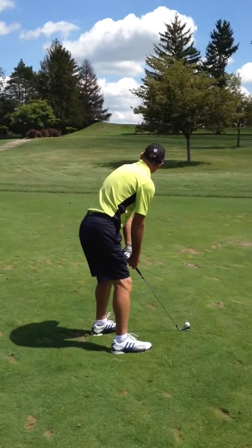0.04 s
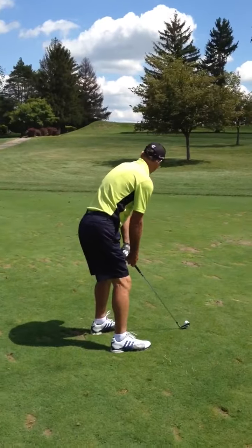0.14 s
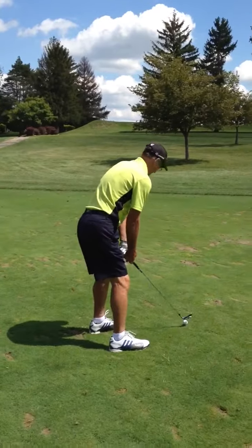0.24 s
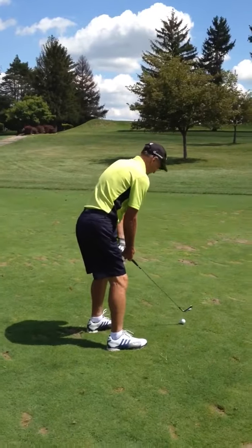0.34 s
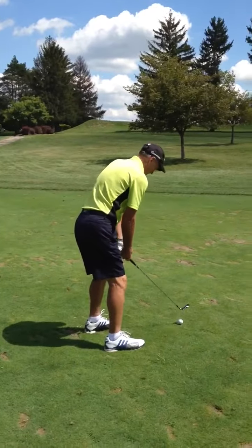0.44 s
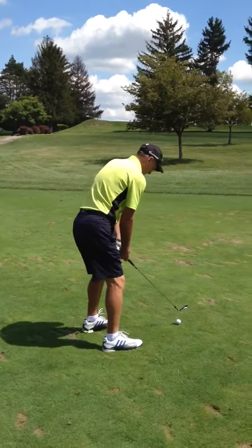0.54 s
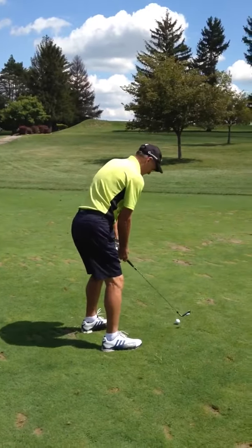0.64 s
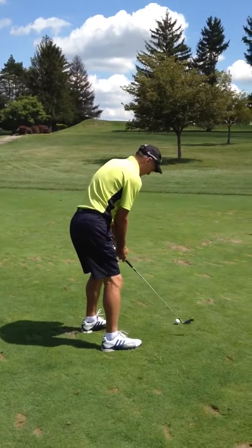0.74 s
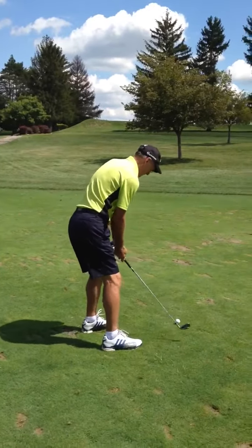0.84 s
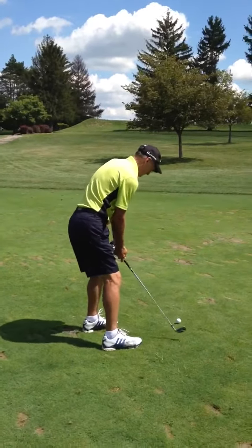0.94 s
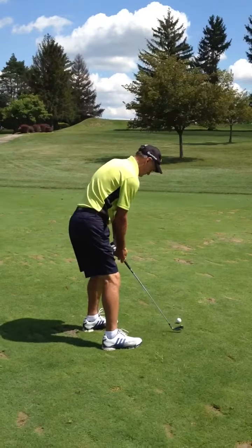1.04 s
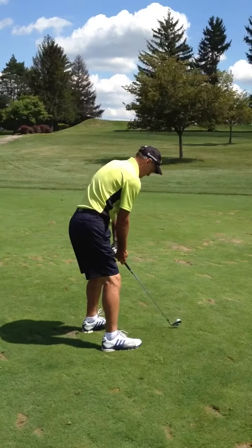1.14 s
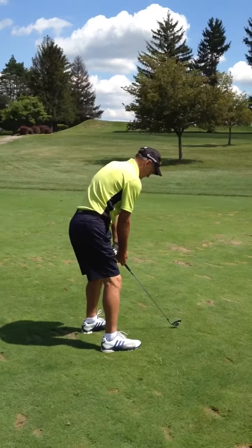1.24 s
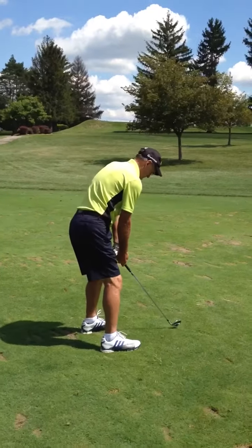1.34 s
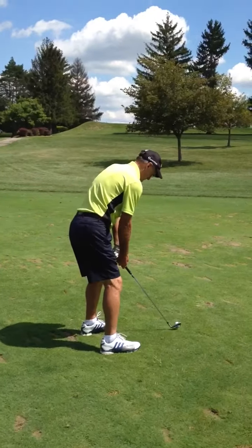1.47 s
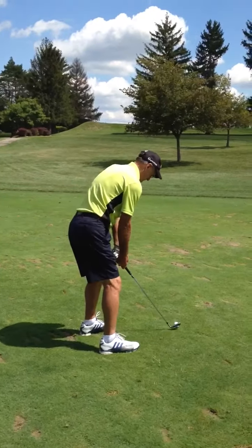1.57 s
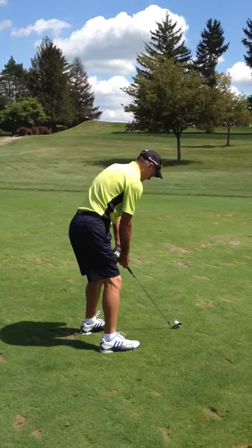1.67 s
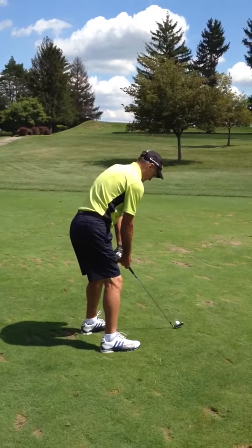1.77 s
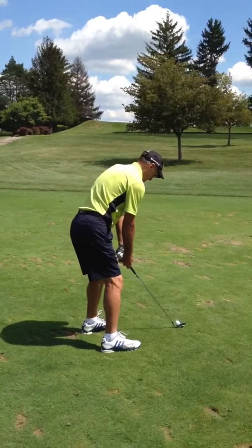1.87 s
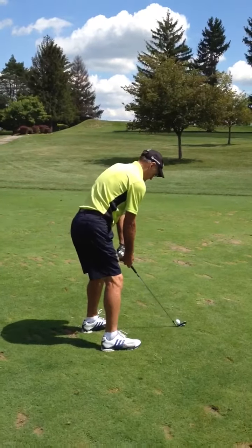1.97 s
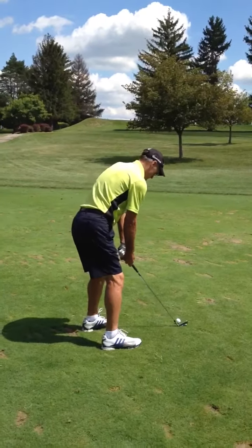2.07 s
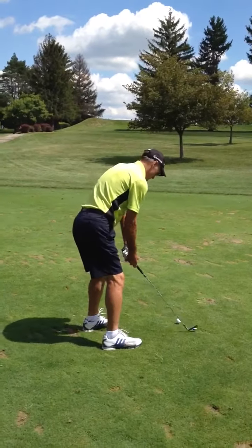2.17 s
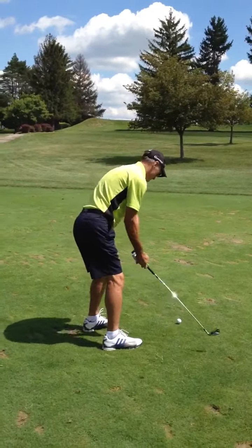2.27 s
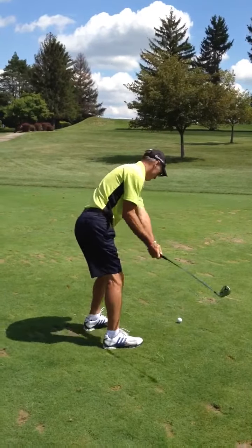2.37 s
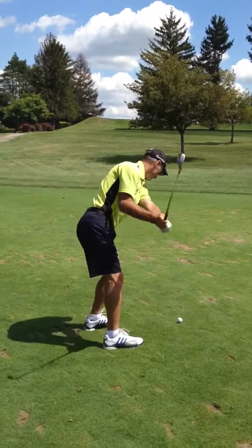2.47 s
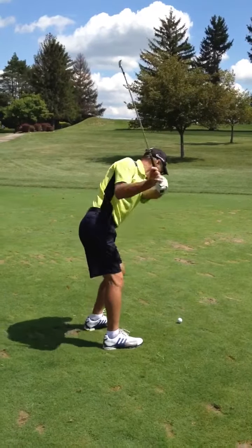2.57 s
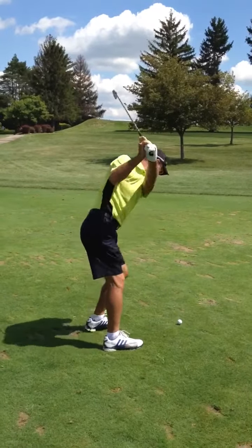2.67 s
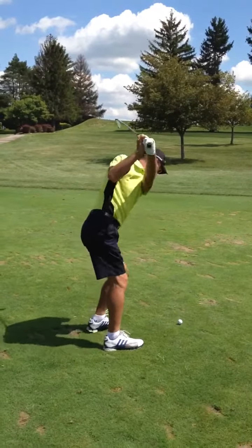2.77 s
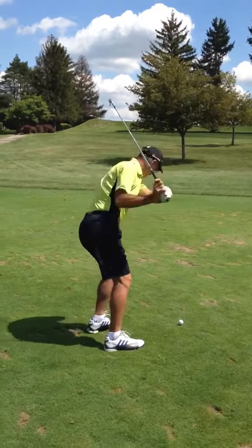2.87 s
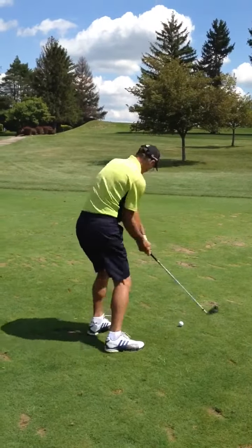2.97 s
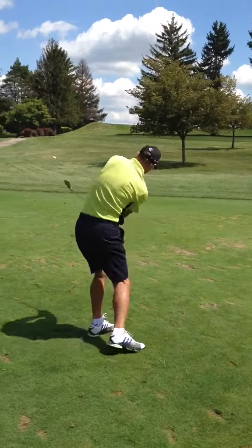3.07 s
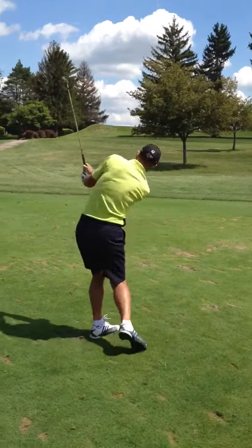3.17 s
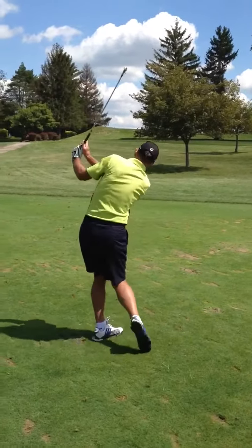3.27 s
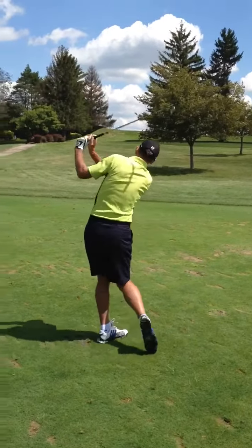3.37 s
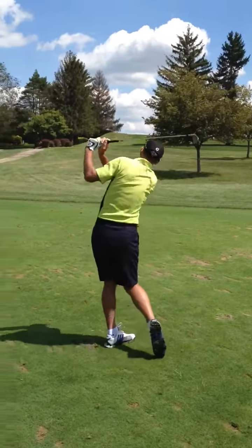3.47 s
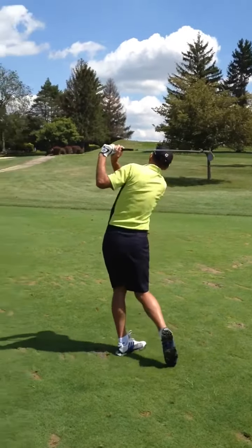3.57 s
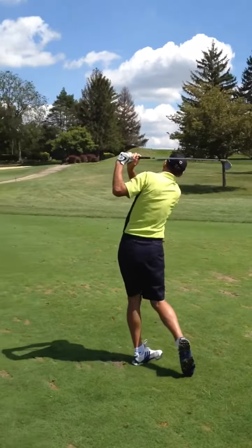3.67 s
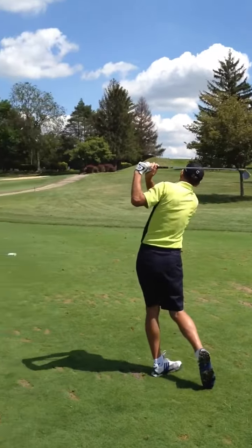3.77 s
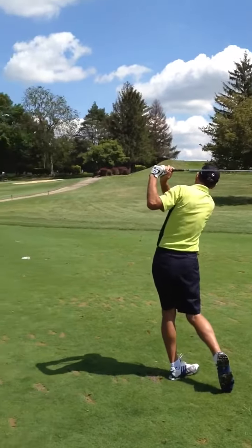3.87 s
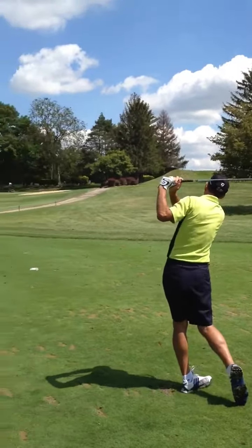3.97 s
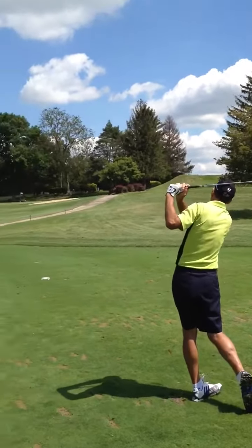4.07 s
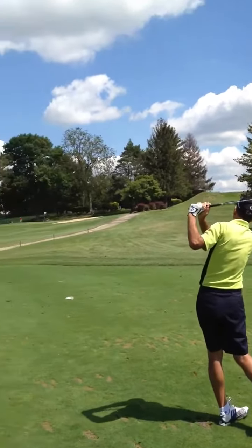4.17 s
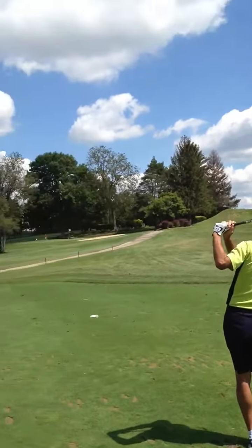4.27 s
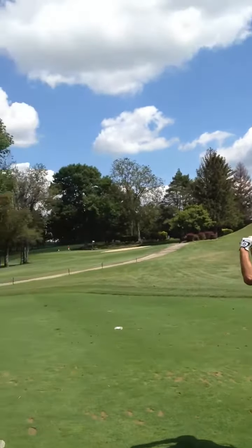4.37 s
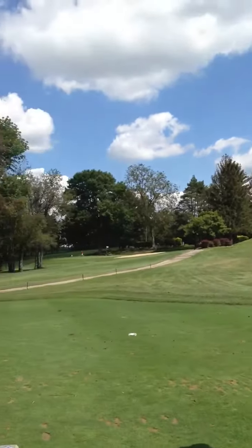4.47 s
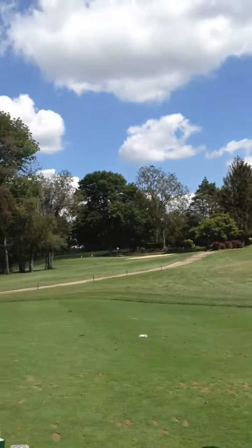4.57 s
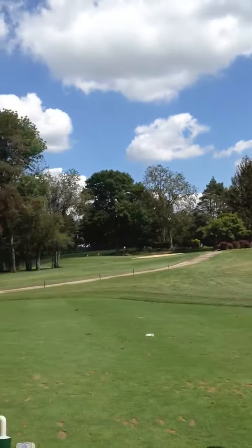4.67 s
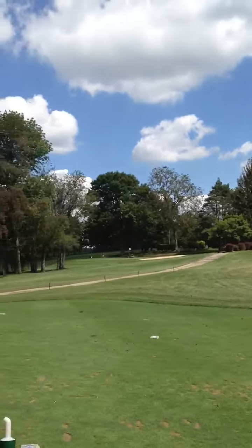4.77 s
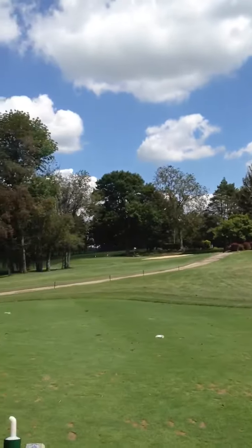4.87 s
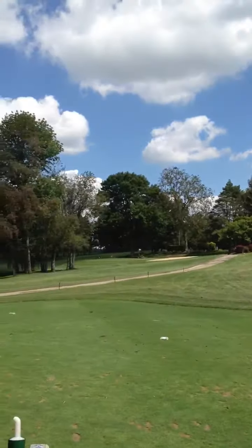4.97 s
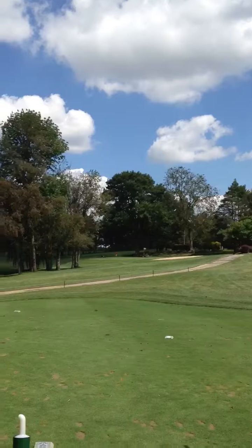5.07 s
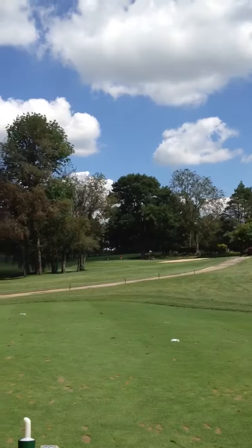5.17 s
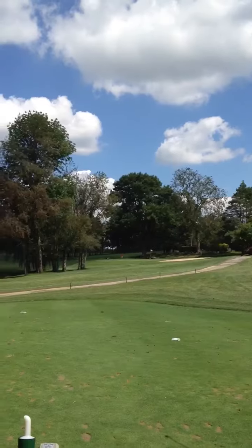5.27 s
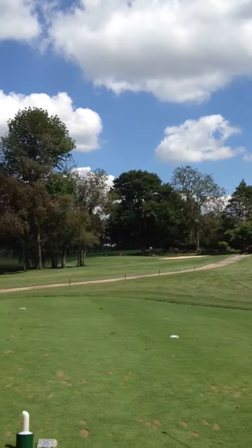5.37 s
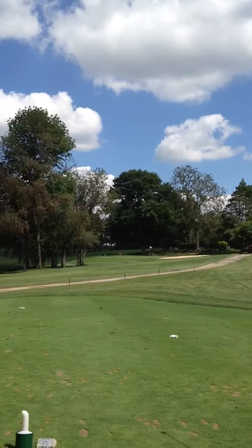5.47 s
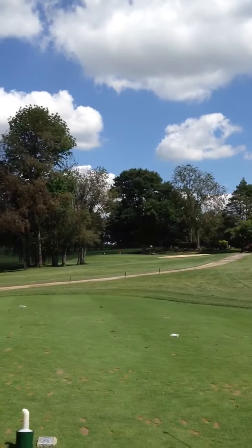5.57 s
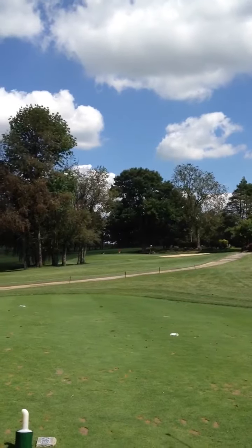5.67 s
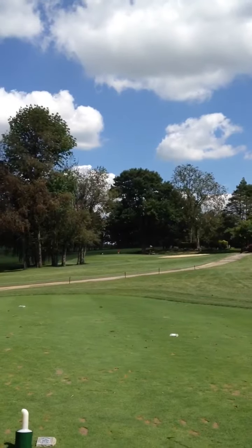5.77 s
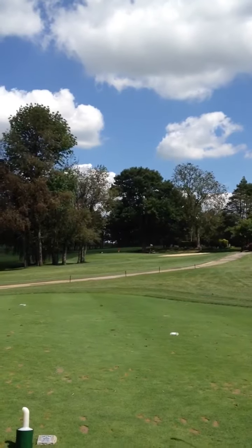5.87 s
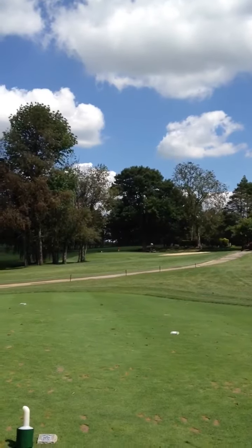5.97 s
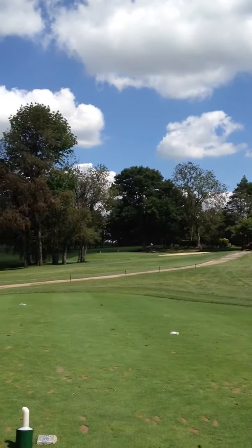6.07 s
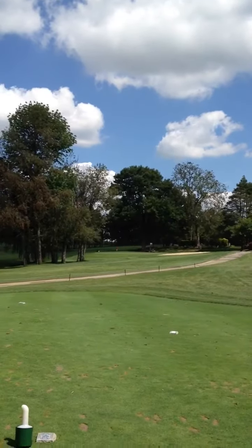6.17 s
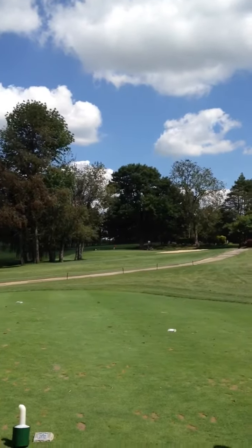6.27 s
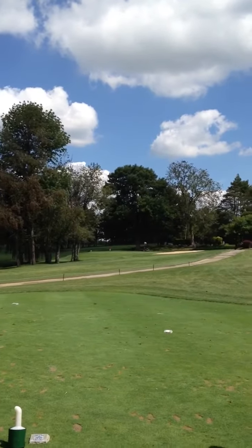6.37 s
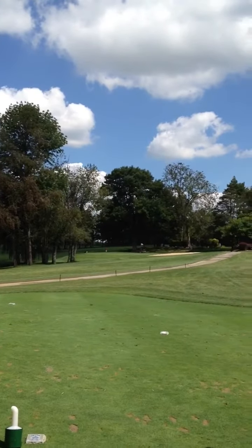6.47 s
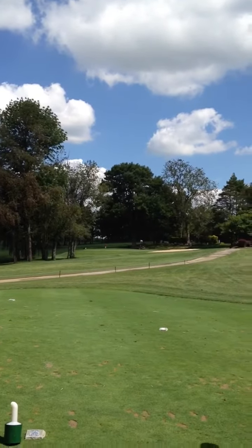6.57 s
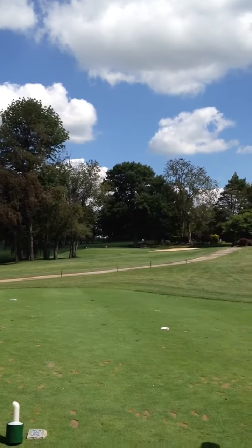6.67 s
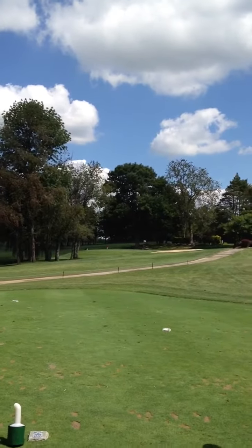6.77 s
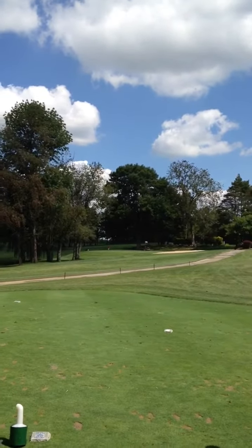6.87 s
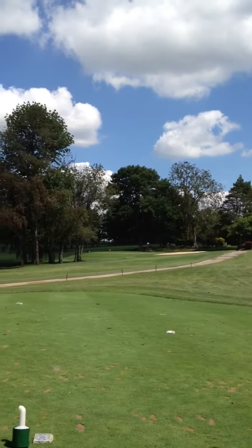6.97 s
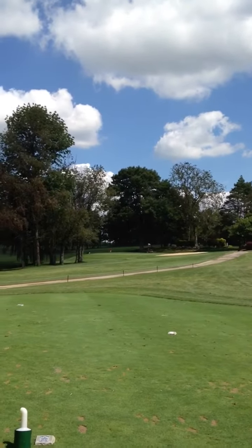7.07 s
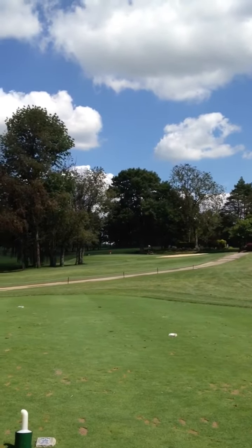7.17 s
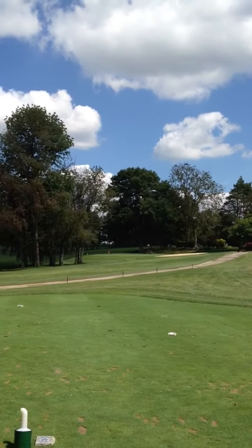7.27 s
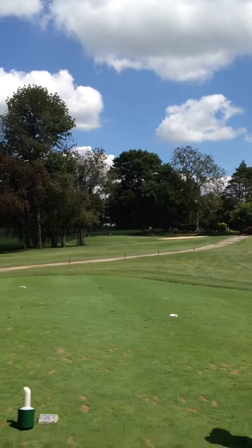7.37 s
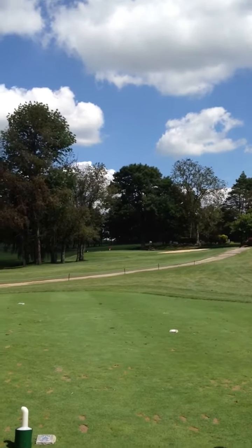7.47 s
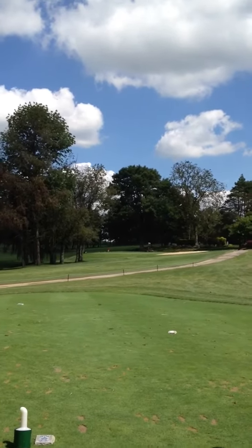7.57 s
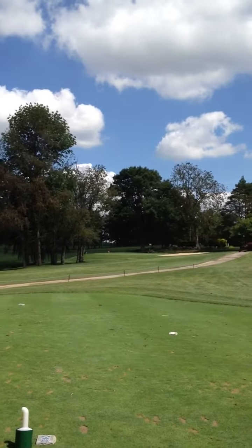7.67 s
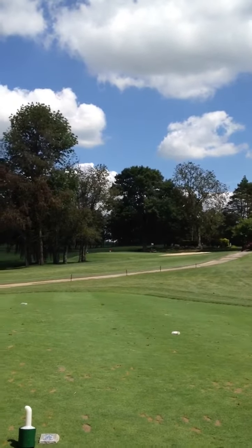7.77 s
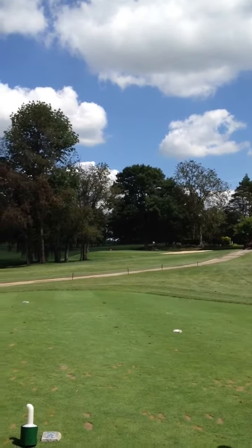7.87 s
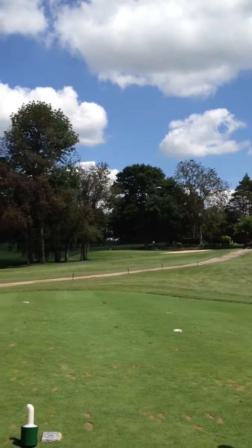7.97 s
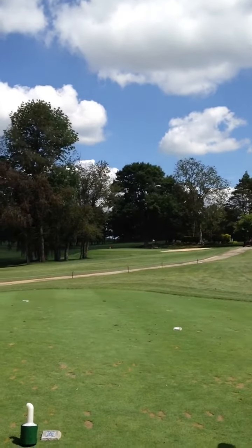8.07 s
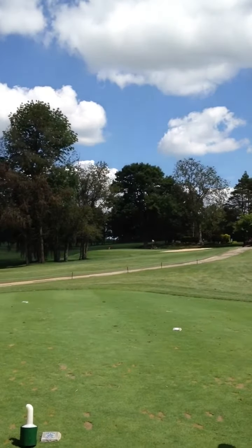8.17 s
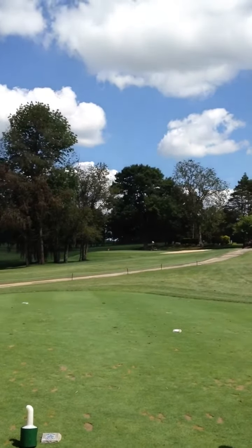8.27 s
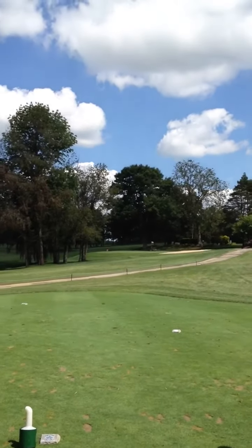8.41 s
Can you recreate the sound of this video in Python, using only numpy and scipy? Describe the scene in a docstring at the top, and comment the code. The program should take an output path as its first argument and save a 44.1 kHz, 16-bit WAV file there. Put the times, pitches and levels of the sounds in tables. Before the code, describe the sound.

Crickets hiss and katydids buzz outdoors while a golfer strikes a ball once, with a quick swish, a crack and a scuff of turf.

```python
"""A golfer swings an iron: vortex shedding makes a swish, impact excites the modes of club and ball in
one sharp crack, and the sole scuffs up a spray of turf. In the summer grass insects stridulate: katydids
take turns with a few ticks and a buzz that swells and stops short, over a hiss of crickets. A distant
mower drones at harmonics of its firing rate, two faint whines pass, and the air is a steady wash.
The hand-held mono microphone is bumped after the shot."""
import sys
import numpy as np
from scipy import signal
from scipy.fft import rfft, irfft
from scipy.io import wavfile

SR = 44100
rng = np.random.default_rng(int(sys.argv[2]) if len(sys.argv) > 2 else 0)


def persist_wave(psi):
    """Save psi, clipped to +-1, as 16-bit WAV."""
    counts = np.round(np.clip(psi, -1, 1) * 32767).astype(np.int16)
    wavfile.write(sys.argv[1], SR, np.atleast_2d(counts).T)


N = 372204
T = np.arange(N) / SR
STRIKE_S = 3.0336  # the club meets the ball

# Modes of club head and ball (f/Hz, level/dB, T60/s, sign at the point of contact)
CLUB_MODES = [(790, -17, 0.0089, -1), (1900, -11.5, 0.0024, 1), (3000, -16.5, 0.0042, -1),
              (3640, -18, 0.0062, 1), (6280, -14.5, 0.0059, -1), (8030, -17.5, 0.0053, -1),
              (9670, -24.5, 0.0098, -1), (11070, -19.5, 0.01, -1), (12500, -20, .007, 1),
              (14700, -24, .005, -1), (1160, -26, 0.019, -1), (1340, -26, 0.028, -1),
              (1550, -50, 0.023, -1), (2770, -32, 0.024, -1), (4890, -28, .02, -1), (5480, -30, .022, -1)]
def strike(contact_s=.0005):
    """Impact excitation: heavily damped modes crack, lightly damped ones ring."""
    top_hz = np.max(CLUB_MODES)
    # low modes start as the ball is squeezed, high ones as it springs off the face
    return sum(sign * ring(STRIKE_S + contact_s * hz / top_hz, hz, db, t60, rise=0.0003)
               for hz, db, t60, sign in CLUB_MODES)


# Whistles of shaft and head in the downswing (peak t/s, half-width/s, level/dB)
WHISTLES = [(3.001, .009, -40.5), (3.0268, 0.0068, -35)]
# Spectrum of the air rushing round the head (f/Hz, relative level/dB)
RUSH_SPECTRUM = [(100, -25), (300, -5), (700, 0), (1300, -5), (1800, -10.5), (4000, -13.5), (6000, -20),
                 (9000, -38)]
def swish(strike_hz=600, sag_hz_per_s=420, rush_peak_s=2.991, rush_peak_db=-45):
    """Vortex shedding: a wavering tone sinks as the club goes by, inside a broad rush of air."""
    vortex_hz = strike_hz - sag_hz_per_s * (T - STRIKE_S)
    tone = unit(np.sin(phase(vortex_hz * (1 + 0.0482 * drift(rate=110)))))
    whistle = sum(amp(db) * hump(s, half) for s, half, db in WHISTLES)
    since_peak = T - rush_peak_s
    rush_db = rush_peak_db + np.minimum(530 * since_peak, -230 * since_peak)  # rise and fall in dB/s
    return whistle * tone + amp(rush_db) * noise(RUSH_SPECTRUM)


# Bursts of turf and grit (t/s, level/dB, rise/s, T60/s)
TURF_BURSTS = [(3.0344, -21.5, .0008, 0.032), (3.048, -49.5, .004, 0.17), (3.082, -48.5, 0.0043, 0.45)]
# Spectrum of the scuff (f/Hz, relative level/dB)
TURF_SPECTRUM = [(100, -26), (250, -4), (400, -10), (700, -3), (1200, 6), (2500, -1.5), (3900, 0.5),
                 (4450, -2), (5000, -3), (6500, 1), (7300, -8), (9000, -6), (13000, -4), (16000, -21)]
def turf():
    """Friction noise: the sole tears the turf and throws grit in decaying bursts."""
    scuff = sum(amp(db) * burst(s, rise, t60) for s, db, rise, t60 in TURF_BURSTS)
    return scuff * noise(TURF_SPECTRUM)


# Knocks of club on ground and of hand on microphone (t/s, f/Hz, level/dB, T60/s)
KNOCKS = [(3.034, 257, -43, 0.15), (3.041, 166, -36.5, 0.027), (5.3513, 138.8, -32, 0.04),
          (5.363, 200, -44, 0.045), (7.136, 116, -46, .05)]
def thumps():
    """Damped oscillation: each soft blow excites one low mode."""
    return sum(ring(s, hz, db, t60, rise=0.0021) for s, hz, db, t60 in KNOCKS)


# Buzzes of katydids answering each other, near and far (start t/s, end t/s, level/dB)
BUZZES = [(-.12, 0.556, -52.5), (.63, 1.358, -56.5), (1.15, 1.65, -59), (1.558, 2.258, -53),
          (2.46, 3.17, -54.5), (3.02, 3.55, -60), (3.39, 4.14, -51.7), (4.061, 4.65, -53.2),
          (4.56, 5.06, -58.5), (5.05, 5.688, -51), (5.65, 6.34, -53.3), (6.219, 6.82, -60.5),
          (6.793, 7.44, -51), (7.34, 7.99, -52.5)]
# Runs of single wing strokes (first t/s, last t/s, level/dB)
TICK_RUNS = [(.622, .622, -49.5), (1.384, 1.531, -46), (2.321, 2.429, -49.3), (3.211, 3.365, -48),
             (4.815, 4.985, -48), (6.618, 6.773, -44.5), (8.269, 8.429, -46.3)]
# Spectrum of the scraped wing (f/Hz, relative level/dB)
KATYDID_SPECTRUM = [(8500, -56), (9800, -10.5), (11000, -3.5), (12050, 2), (12450, -0.5), (12800, 1.5),
                    (13400, 3.5), (14050, 1), (14600, -2), (15300, -1.5), (17000, -10)]
def katydids(stroke_hz=63.0, stroke_db=3.0, far_chorus_db=-68):
    """Stridulation: a wing scrapes a file; fast even strokes buzz, single strokes tick."""
    # incoherent sources add in power
    power = amp(far_chorus_db) ** 2 + sum((amp(db) * phrase(start, end)) ** 2 for start, end, db in BUZZES)
    stroke_phase = phase(stroke_hz * (1 + 0.0065 * drift(rate=2.1)))
    buzz = np.sqrt(power) * unit(amp(stroke_db * np.cos(stroke_phase)))
    ticks = sum(amp(db) * tick_run(first, last) for first, last, db in TICK_RUNS)
    teeth = unit(amp(0.91 * drift(rate=1000)))
    rasp = shimmer(noise(KATYDID_SPECTRUM), depth_db=2.0, width_hz=98, hold_s=0.23)
    return np.hypot(buzz, ticks) * teeth * rasp


def phrase(start, end, swell_s=0.12, stop_t60=0.21):
    """Exponential growth and decay: the envelope of a buzz gathers, holds and stops short."""
    gather = 1 - np.exp(-np.maximum(T - start, 0) / swell_s)
    return gather * np.exp(-np.log(1000) * np.maximum(T - end, 0) / stop_t60)


def tick_run(first, last, gap_s=.053):
    """Pulse train: the envelope of evenly spaced wing strokes, about gap_s apart."""
    times = np.linspace(first, last, round((last - first) / gap_s) + 1)
    return sum(burst(s, rise=.003, t60=0.045) for s in times)


# Spectrum of the cricket chorus (f/Hz, relative level/dB)
CRICKET_SPECTRUM = [(6000, -40), (6750, -19), (7250, -4.5), (7550, -5.5), (7750, -2.5), (7920, -2),
                    (8030, -1.5), (8170, -2.5), (8550, -8.5), (8750, -9), (8870, -5), (9000, -20.5),
                    (9300, -51)]
def crickets(count=6, trill_hz=50, depth=0.25, start_db=-53.5, growth_db_per_s=0.2357):
    """Incoherent summation: trills, each at its own pace, merge into a slowly growing narrow hiss."""
    paces = trill_hz * np.exp(.2 * rng.standard_normal(count))
    phases = [phase(pace * (1 + 0.048 * drift(rate=4.1))) for pace in paces]
    power = sum((1 + depth * np.cos(angle)) ** 2 for angle in phases)
    hiss = tint(np.sqrt(power) * rng.standard_normal(N), CRICKET_SPECTRUM)
    return amp(start_db + growth_db_per_s * T) * hiss


# Spectrum of a far tree cricket (f/Hz, relative level/dB)
TREE_CRICKET_SPECTRUM = [(4000, -20), (4300, -1.5), (4420, -5), (4560, -3), (4900, -4), (5300, -20)]
def tree_crickets(trill_hz=45, note_hz=4330, note_db=-78.5, band_db=-71):
    """Amplitude modulation: one trill pulses a faint noise band and the nearest insect's thin note."""
    trill = 1 + 0.29 * np.sin(phase(trill_hz * (1 + .03 * drift(rate=2.7))))
    note_gain = amp(note_db + 1.8 * drift(rate=1.8))
    note = unit(np.sin(phase(note_hz * (1 + 0.00408 * drift(rate=40.4)))))
    band = amp(band_db + 0.43 * drift(rate=2)) * noise(TREE_CRICKET_SPECTRUM)
    return trill * (band + note_gain * note)


# Running of the engine (t/s, firing f/Hz, boost of the fourth harmonic/dB)
FIRING = [(0, 80, -11), (1.2, 80.2, -3), (2.3, 81, -8), (3.7, 79.34, 6.5), (4.5, 78.5, -7.5),
          (7.4, 76.4, -16)]
# Harmonics of the exhaust drone (multiple of the firing rate, relative level/dB)
HARMONICS = [(1, -8.5), (3, 0.5), (4, 1)]
# Wind-borne contours of hum, drone and blade roar, before deepening and trim (t/s, level/dB)
HUM_CONTOUR = [(.3, -63), (.8, -69), (1.6, -67), (2.6, -59), (3.4, -61), (3.8, -63.5), (4.6, -56),
               (5.1, -65.5), (6.2, -64.5), (7, -60), (7.37, -51.5), (7.75, -61)]
DRONE_CONTOUR = [(0, -66), (.45, -59.5), (.7, -53.5), (.92, -57.5), (1.4, -57.5), (1.65, -61.5),
                 (1.85, -54), (2.06, -53), (2.28, -60), (2.48, -50.5), (2.72, -57), (3.6, -60.5),
                 (3.9, -56), (5.3, -61), (7.3, -59.5), (7.7, -65.5), (8.05, -59)]
ROAR_CONTOUR = [(0, -60.5), (.8, -59.5), (1.15, -55), (1.6, -57), (2.25, -54), (2.8, -57), (4.4, -60),
                (8.44, -64)]
# Spectra of exhaust rumble and blade roar (f/Hz, relative level/dB)
RUMBLE_SPECTRUM = [(130, -25), (190, -2), (230, -0.5), (300, 2), (360, -5.5), (430, -13), (800, -29.5)]
ROAR_SPECTRUM = [(250, -9.5), (480, -5.5), (620, 2), (850, -4.5), (1300, -12), (2200, -24), (5000, -24)]
def mower():
    """Atmospheric fading: engine harmonics come and go over exhaust rumble and blade roar."""
    hum_db, drone_db, roar_db = curves(HUM_CONTOUR) + curves(DRONE_CONTOUR) + curves(ROAR_CONTOUR)
    firing_hz, fourth_db = curves(FIRING)
    firing = phase(firing_hz * (1 + 0.0048 * drift(rate=2.9) + 0.0076 * drift(rate=30.7)))
    second_order = amp(1.6 * drift(rate=22)) * np.sin(2 * firing)
    half_order = amp(-1.0) * drift(rate=18) * np.sin(2.5 * firing)  # from uneven firing
    hum = unit(second_order + half_order)
    orders, order_db = np.transpose(HARMONICS)
    gains = np.array([amp(db + 3.8 * drift(rate=13)) for db in order_db])
    gains[-1] *= amp(fourth_db)
    gains /= np.linalg.norm(gains, axis=0)  # the harmonics share a constant power
    drone = unit((gains * np.sin(np.outer(orders, firing))).sum(axis=0))
    # the tones surge more than the rumble beneath them
    tones = amp(deepen(hum_db, 1.14) - 2.5) * hum + amp(deepen(drone_db, 1.48) - 0.5) * drone
    rumble = shimmer(noise(RUMBLE_SPECTRUM), depth_db=1.5, width_hz=30, hold_s=0.14)
    roar = amp(deepen(roar_db, 1.26) - 2.0) * noise(ROAR_SPECTRUM)
    return tones + amp(deepen(drone_db, 0.79) - 4.0) * rumble + roar


# Two far whines, one running into the other (peak t/s, half-width/s, f/Hz, level/dB)
WHINES = [(2.06, .075, 898, -57.5), (2.185, 0.052, 912, -53.5)]
def whines():
    """Random frequency modulation: thin tones waver slightly as they swell and fade."""
    waver = 1 + 0.0088 * drift(rate=56)
    return sum(amp(db) * hump(s, half) * unit(np.sin(phase(hz * waver))) for s, half, hz, db in WHINES)


# Spectrum of the open air over the course (f/Hz, relative level/dB)
AIR_SPECTRUM = [(20, -21), (55, -1), (90, -4.5), (125, 4), (200, 1.5), (400, -3.5), (510, 0.5), (620, -4.5),
                (1000, -4.5), (1600, -7), (4600, -9), (5500, -12), (8800, -16.5), (9500, -46)]
def air(level_db=-56.5):
    """Ambient noise: the steady broadband wash of trees and distance."""
    return amp(level_db + 0.3 * drift(rate=12)) * noise(AIR_SPECTRUM)


def amp(db):
    """Decibels to amplitude ratio."""
    return 10 ** (np.asarray(db) / 20)


def unit(x):
    """Normalisation to an rms of 1."""
    return x / np.sqrt(np.mean(x ** 2) + 1e-20)


def curves(rows):
    """Linear interpolation of each column of a timed table, sample by sample."""
    times, *columns = np.transpose(rows)
    return [np.interp(T, times, column) for column in columns]


def deepen(db, ratio):
    """Dynamic range scaling: the crest stays; lulls deepen for a ratio above 1 and fill in below 1."""
    return db.max() + ratio * (db - db.max())


def tint(x, spectrum):
    """Spectral shaping: x filtered by a table of (f/Hz, level/dB), at an rms of 1."""
    hz, db = np.transpose(spectrum)
    gain = amp(np.interp(np.log(np.fft.rfftfreq(N, 1 / SR) + 1), np.log(hz), db))
    return unit(irfft(rfft(x) * gain, N))


def noise(spectrum):
    """Filtered Gaussian noise."""
    return tint(rng.standard_normal(N), spectrum)


def drift(rate):
    """Low-pass noise: a smooth fluctuation that changes about rate times a second."""
    spectrum = rfft(rng.standard_normal(8192)) * np.exp(-(np.arange(4097) / (T[-1] * rate)) ** 2)
    slow = unit(irfft(spectrum))
    return np.interp(T, np.linspace(0, T[-1], len(slow)), slow)


def shimmer(x, depth_db, width_hz, hold_s):
    """Spectral modulation: narrow bands of x brighten and fade at random."""
    bands = signal.stft(x, nperseg=1024, noverlap=768)[2]
    patches = rng.standard_normal(bands.shape)
    for axis, span in enumerate([width_hz * 1024 / SR, hold_s * SR / 256]):
        smooth = signal.windows.gaussian(201, span / 2)
        patches = signal.fftconvolve(patches, np.expand_dims(smooth, 1 - axis), "same")
    bands *= amp(depth_db * unit(patches))
    return unit(signal.istft(bands, nperseg=1024, noverlap=768)[1][:N])


def phase(hz):
    """Phase as the time integral of frequency."""
    return 2 * np.pi * np.cumsum(hz * np.ones(N)) / SR


def hump(s, half):
    """Gaussian envelope centred on time s, down to 1/e at half seconds either side."""
    return np.exp(-((T - s) / half) ** 2)


def burst(s, rise, t60):
    """Transient envelope: a linear rise from time s, then exponential decay."""
    envelope = np.zeros(N)
    part = envelope[round(s * SR):][:SR // 2]
    t = T[:len(part)]
    part += np.minimum(t / rise, 1) * np.exp(-np.log(1000) * np.maximum(t - rise, 0) / t60)
    return envelope


def ring(s, hz, db, t60, rise):
    """Damped sinusoid: one mode struck at time s."""
    return amp(db) * burst(s, rise, t60) * np.sin(2 * np.pi * hz * (T - s))


def scene():
    """Superposition: all sources add at one microphone, which feeds both channels."""
    golfer = swish() + strike() + turf() + thumps()
    insects = katydids() + crickets() + tree_crickets()
    mono = golfer + insects + mower() + whines() + air()
    return np.array([mono, mono])


def record(dry, low_cut_hz=105, band_limit_hz=15500):
    """Band limiting: the microphone's bass cut, then a steep treble cut."""
    highpass = signal.butter(3, low_cut_hz, "highpass", fs=SR, output="sos")
    lowpass = signal.firwin(511, band_limit_hz, window=("kaiser", 8), fs=SR)
    return signal.oaconvolve(signal.sosfilt(highpass, dry), lowpass[None], "same", axes=1)


dry = scene()
out = record(dry)
persist_wave(out)
```